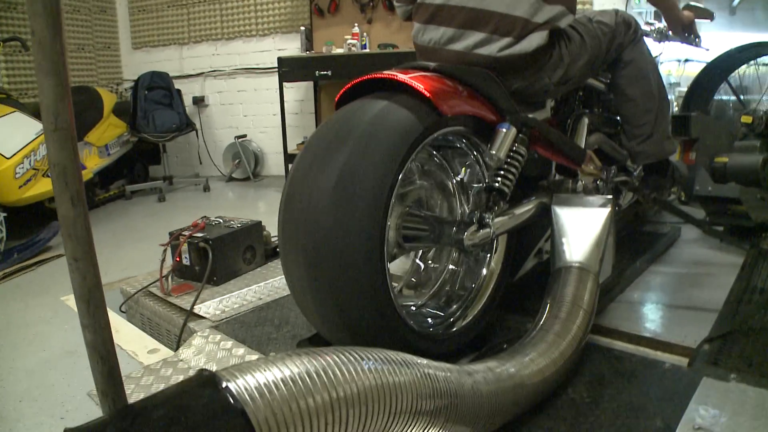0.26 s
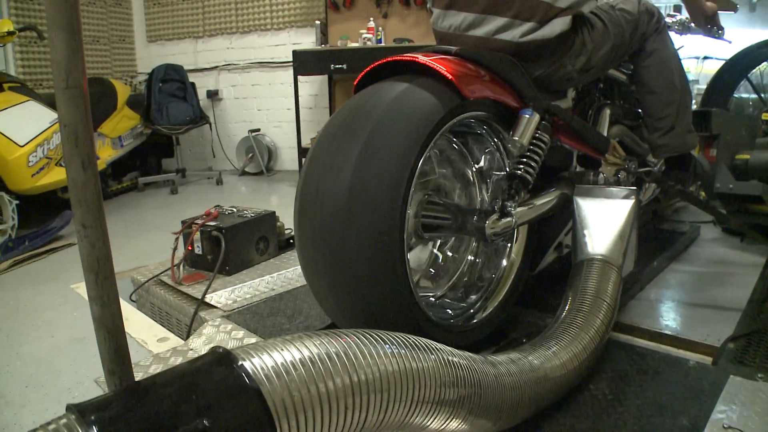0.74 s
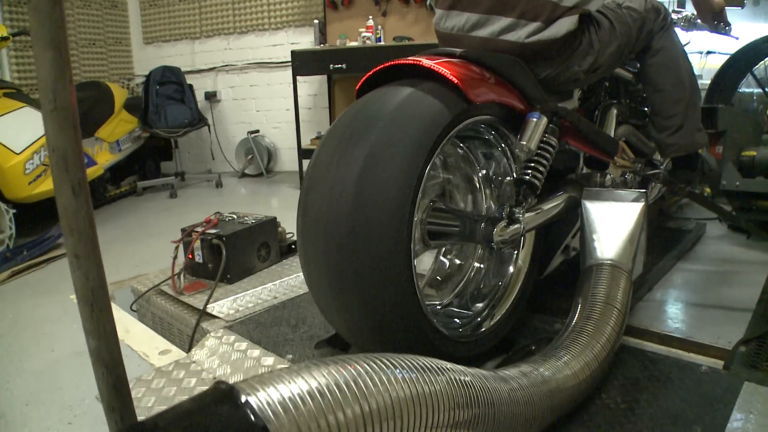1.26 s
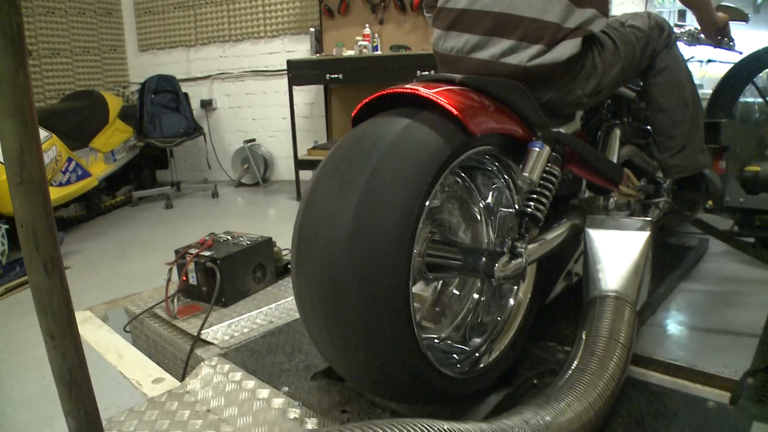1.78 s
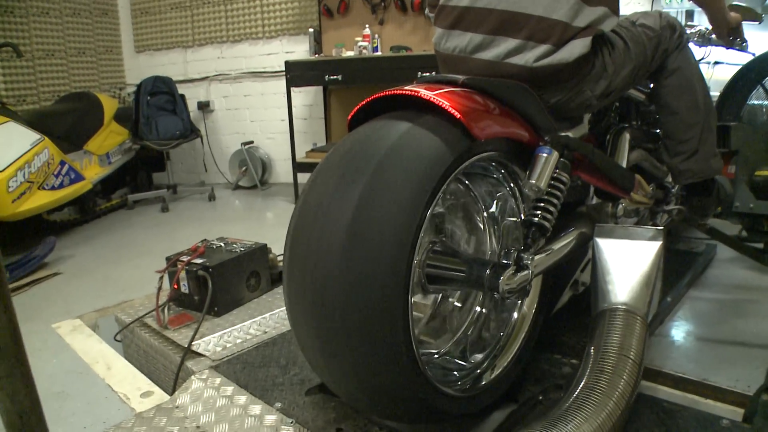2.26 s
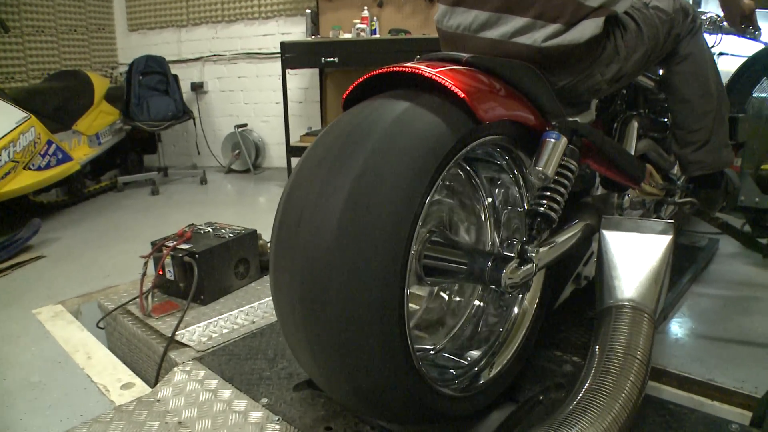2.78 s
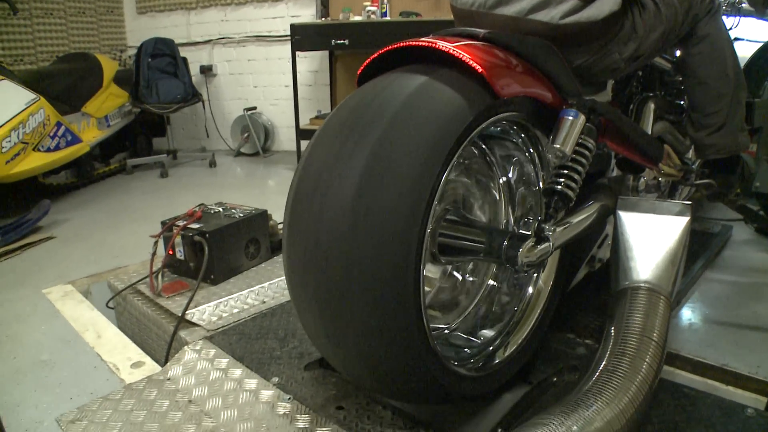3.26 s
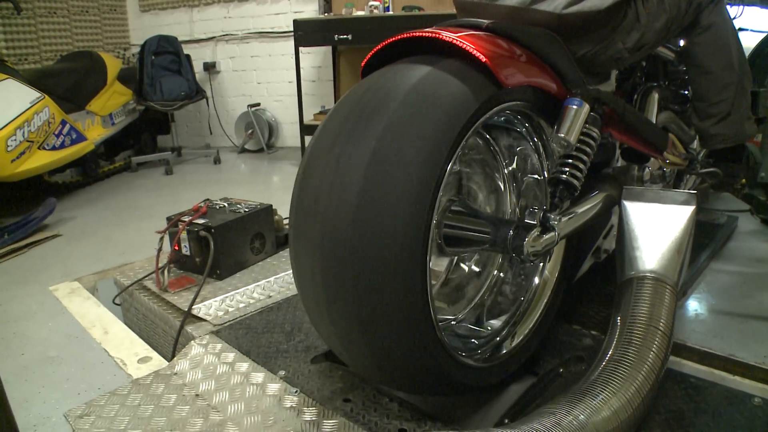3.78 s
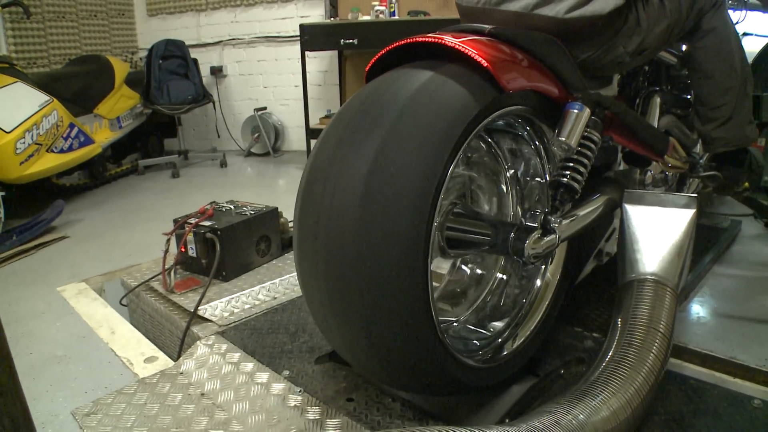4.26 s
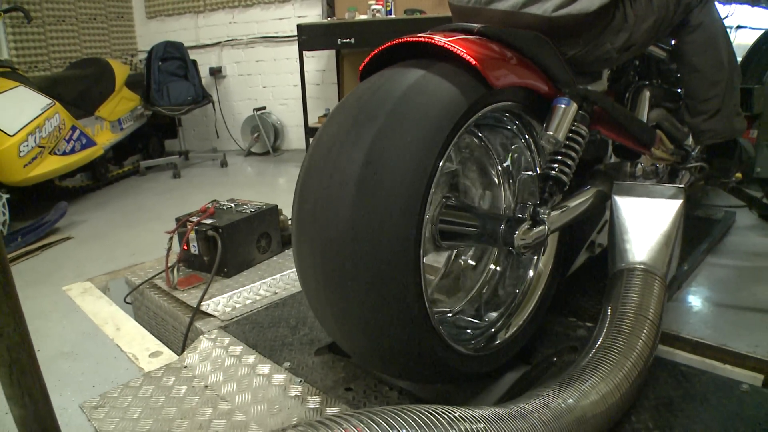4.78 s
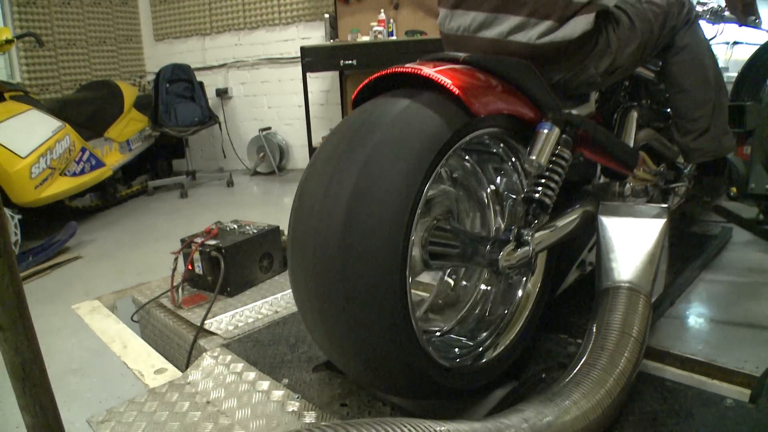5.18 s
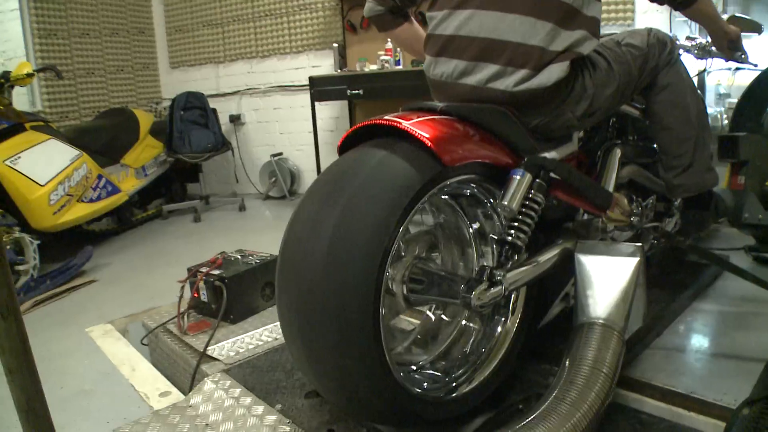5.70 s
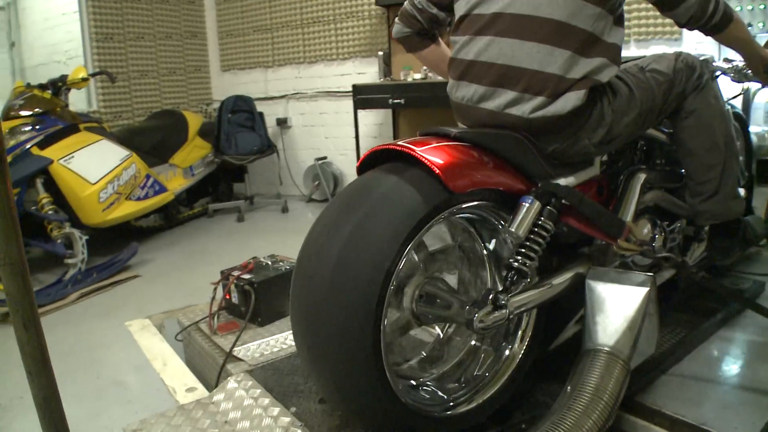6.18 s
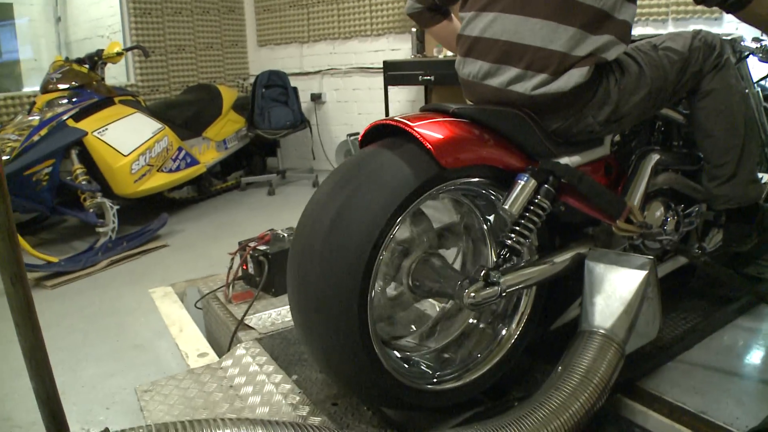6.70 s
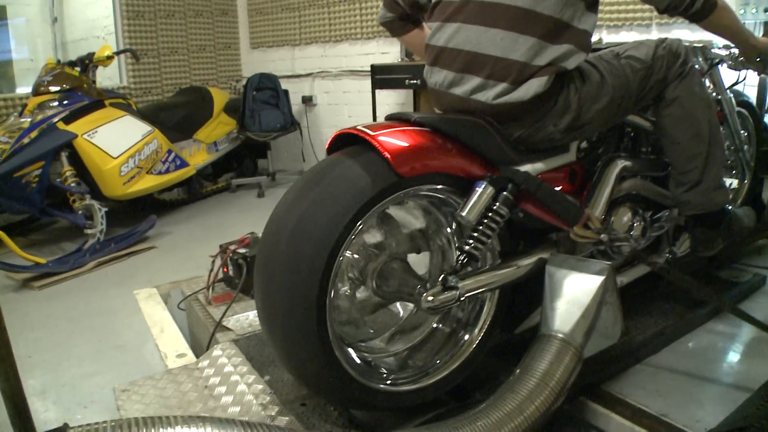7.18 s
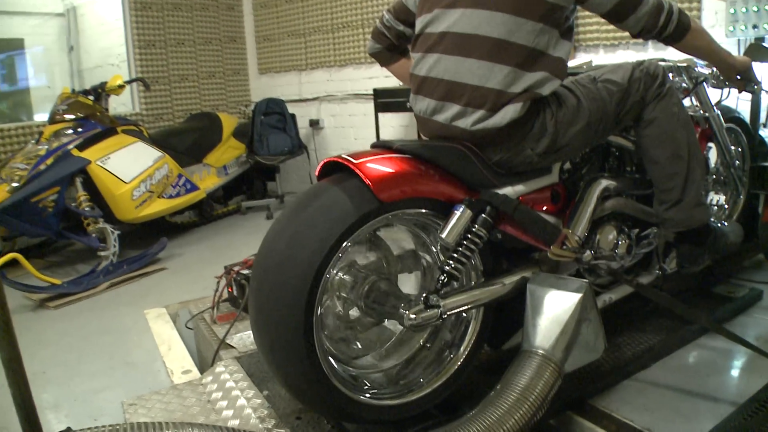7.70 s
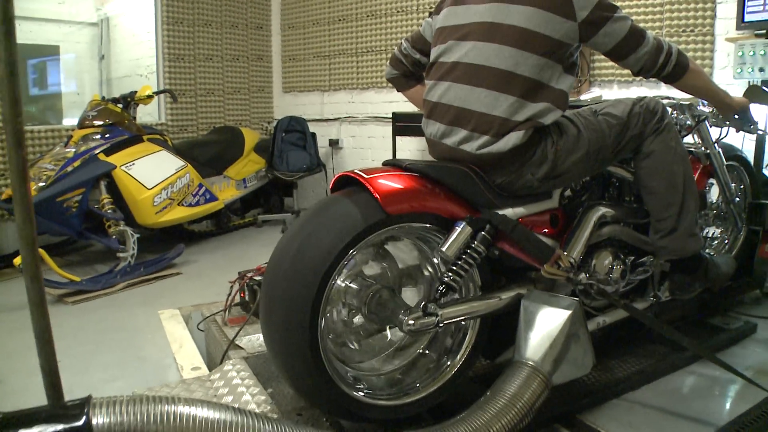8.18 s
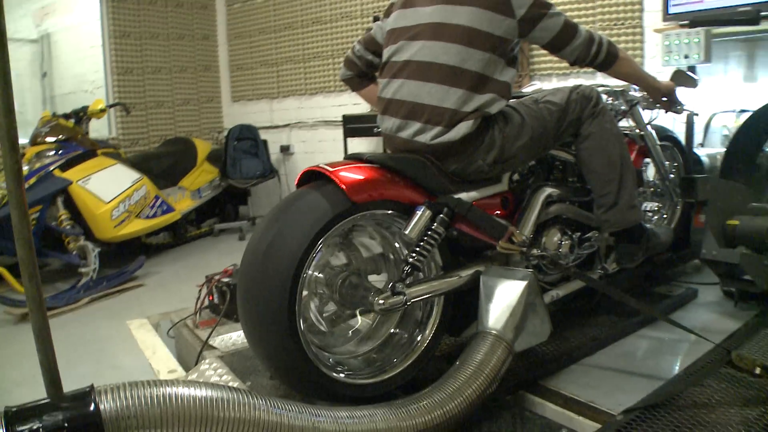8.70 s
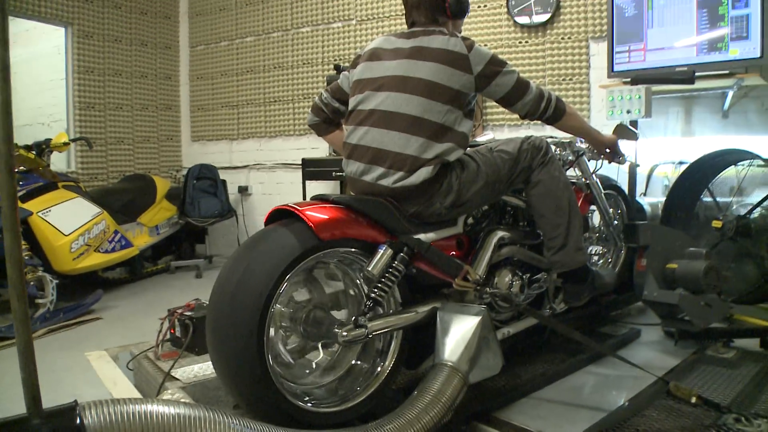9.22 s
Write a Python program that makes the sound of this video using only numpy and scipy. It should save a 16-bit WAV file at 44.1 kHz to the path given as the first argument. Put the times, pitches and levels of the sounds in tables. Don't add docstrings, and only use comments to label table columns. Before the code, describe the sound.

Close behind the rear wheel, a large V-twin runs on rollers in a padded workshop. Its deep exhaust throbs fast and unevenly at about seventeen cycles a second, with heavy thumps, brief choked gaps and sharp spits. Valve clatter and hiss ride on top. After the middle it quickens, smooths and rises slightly in pitch while gear whine and a faint breathy compressor whistle emerge. Stereo microphone, loud and lightly saturated.

```python
import sys
import numpy as np
from scipy import signal
from scipy.fft import rfft, irfft, next_fast_len
from scipy.io import wavfile
from scipy.ndimage import uniform_filter1d

SR = 44100
rng = np.random.default_rng(int(sys.argv[2]) if len(sys.argv) > 2 else 0)


def to_linear_factor(level_db):
    exponent = np.asarray(level_db, float) / 20
    return 10 ** exponent


def wav_out(sig):
    wavfile.write(sys.argv[1], SR, np.round(np.clip(np.atleast_2d(sig).T, -1, 1) * 32767).astype(np.int16))


N = 416744
PAD = next_fast_len(N + SR)


def rms_one(x):
    return x / np.sqrt(np.mean(x ** 2) + 1e-20)


def in_time(rows):
    s, *columns = np.transpose(rows)
    return [np.interp(np.arange(N) / SR, s, c) for c in columns]


def in_pitch(rows):
    hz, *columns = np.transpose(rows)
    grid = np.log(np.arange(PAD // 2 + 1) * SR / PAD + 1)
    return [np.interp(grid, np.log(hz), c) for c in columns]


def resonance(hz, width_hz):
    grid = np.arange(PAD // 2 + 1) * SR / PAD
    return 1j * grid * width_hz / (hz ** 2 - grid ** 2 + 1j * grid * width_hz)


def boost_or_dip(hz, width_hz, db):
    return 1 + (to_linear_factor(db) - 1) * resonance(hz, width_hz)


def shaped(x, response):
    return irfft(rfft(x, PAD) * response, PAD)[..., :N]


def contacts(turns, share):
    return np.flatnonzero(np.diff(np.floor(turns - share)) > 0)


def exhaust(turns, cycle_hz, exhaust_db, uneven, moved):
    # f/Hz, width/Hz, level/dB first place, level/dB second place, sign at the
    duct = [(41.9, 4.0, -11.8, -9.2, 1), (50.9, 74.9, -21.1, -22.9, -1), (73.9, 12.5, -8.6, -7.7, 1),
            (88.6, 10.7, -4.7, -2.5, -1), (97.4, 16.6, -12.0, -4.5, 1), (125.3, 16.9, -6.4, -5.0, -1),
            (135.5, 9.4, -3.7, -5.4, 1), (152.5, 4.0, -14.1, 4.4, 1), (177.7, 6.8, -2.0, 1.9, 1),
            (185.2, 4.4, -1.9, 1.7, -1), (194.4, 10.4, 0.2, -4.6, 1), (212.1, 5.7, -0.0, 3.1, -1),
            (221.5, 5.7, -0.3, 4.9, 1), (243.5, 5.9, 2.6, 3.9, -1),
            (253.4, 6.1, -11.0, -1.7, 1), (273.6, 4.4, -15.5, -9.6, 1), (296.4, 4.0, -0.7, -6.5, 1),
             (323.0, 19.8, -26.6, -14.7, -1), (335.3, 8.2, -20.1, -11.9, 1), (402.2, 25.0, -14.5, -32.0, 1),
             (412.6, 37.6, -14.6, -22.5, -1), (472.6, 37.0, -24.7, -18.8, -1),
             (509.9, 20.4, -26.4, -18.9, 1), (568.3, 47.0, -11.5, -17.2, -1), (572.5, 30.5, -8.8, -19.2, 1),
             (644.9, 25.3, -27.0, -18.5, 1), (718.1, 131.9, -64.1, -25.0, -1),
             (972.1, 157.7, -19.8, -44.8, 1)]
    # f/Hz, width/Hz, level/dB
    cold_duct = [(199, 18, 5.5), (222.7, 12.7, -13), (279, 30, -9.5)]
    # f/Hz, width/Hz, level/dB
    first_place_dip = (395, 13.3, -19)
    warm_from_s, warm_takes_s = 1.3, .74
    jitter_s = .001
    roar_db, roar_aside_db = 13, -4

    pulses = np.zeros(N + SR)
    # share of the cycle, dB
    for share, level_db in ((0, 0), (.593, -16.7)):
        at = contacts(turns, share)
        strength, late = rng.standard_normal((200, 2))[:len(at)].T
        now = np.clip(at - SR, 0, N - 1)
        delay = (jitter_s * SR * uneven[now] * late).astype(int)
        at = np.clip(at + delay, 0, N + SR - 1)
        pulses[at] = to_linear_factor(level_db) * (1 + uneven[now] * strength) * SR / cycle_hz[now] / 2
    roar = to_linear_factor(roar_db + roar_aside_db * np.r_[np.zeros(SR), moved])
    pulses += roar * rng.standard_normal(N + SR)
    spectrum = rfft(pulses, PAD) * walls()

    first, second = 0, 0
    for hz, width_hz, first_db, second_db, sign in duct:
        mode = sign * resonance(hz, width_hz)
        first = first + to_linear_factor(first_db) * mode
        second = second + to_linear_factor(second_db) * mode
    first = first * boost_or_dip(*first_place_dip)
    cold = first * np.prod([boost_or_dip(*row) for row in cold_duct], axis=0)
    cold, first, second = (irfft(spectrum * place, PAD)[SR:SR + N] for place in (cold, first, second))
    warm = np.clip((np.arange(N) / SR - warm_from_s) / warm_takes_s, 0, 1)
    first = cold + warm * (first - cold)
    return to_linear_factor(exhaust_db + 2.5) * ((1 - moved) * first + moved * second)


def walls():
    scatter_hz, scatter_s, pulse_cut_hz = 325, .045, 820
    grid = np.arange(PAD // 2 + 1) * SR / PAD
    echoes = rfft(rng.standard_normal(SR) * np.exp(-np.arange(SR) / SR / scatter_s), PAD)
    smear = np.where(grid > scatter_hz, echoes / abs(echoes), 1)
    return smear / np.sqrt(1 + (grid / pulse_cut_hz) ** 12)


def unevenness():
    # t/s, added share, relative length
    stumbles = [
        (.55, .35, 1),
        (1.35, .38, 1),
        (2.65, .27, 1),
        (4.3, .15, 1),
        (5.42, .34, 1.6),
        (9.04, .7, .4),
    ]
    cold, settled, settle_s, stumble_s = .2, .03, 4.6, .17
    t = np.arange(N) / SR
    uneven = settled + (cold - settled) * np.exp(-(t / settle_s) ** 2)
    for s, share, length in stumbles:
        uneven += share * np.exp(-((t - s) / (length * stumble_s)) ** 2)
    return uneven


def heavy_firings(ringing):
    # t/s, peak level/dB
    heavy = [(0.172, -0.5), (0.351, -1.5), (0.409, -4), (0.644, -3), (1.234, -4), (1.305, -2),
             (1.473, -1.5), (1.591, 0.5), (1.708, -2.5), (1.766, -5.5), (1.885, -0.5), (2.002, -4.5),
             (2.122, -1), (2.181, -3), (2.238, -6), (2.358, 0), (2.479, -3.5), (2.594, -1.5), (4.302, -1.5),
             (4.921, -4.5), (4.979, -2.5), (5.091, -5), (5.236, -0.5), (5.294, -9), (5.469, -1.5),
             (5.586, -2.5), (5.701, -4), (5.759, -3), (9.045, -8)]
    # start t/s, end t/s, spacing/s, peak level/dB
    lopes = [
        (0.825, 1.1, .118, -5),
        (2.774, 4.2, .118, -3),
        (6.349, 6.72, .0563, -3.5),
    ]
    # f/Hz, share
    choked = [(110, 0), (150, 1)]
    swell_hz, warming_hz_per_s, warm_hz = 190.5, 9.9, 224.5
    choke_db, choke_late_s, choke_s = .5, .0018, .01
    lean_choke = .42

    out, choke = np.zeros(N), np.zeros(N)
    t = np.arange(-.03, .04, 1 / SR)
    swell = np.exp(-(t / np.where(t < 0, .009, .005)) ** 2)
    sag = np.exp(-((t - choke_late_s) / choke_s) ** 2)
    loping = [(s, peak_db) for start, end, step, peak_db in lopes for s in np.arange(start, end, step)]
    for s, peak_db in heavy + loping:
        hz = min(swell_hz + warming_hz_per_s * s, warm_hz)
        i = round((s + .00591 + t[0]) * SR)
        out[i:i + len(t)] += to_linear_factor(peak_db - 4.5) * swell * np.cos(2 * np.pi * hz * t * (1 - 4.5 * t))
        choke[i:i + len(t)] += to_linear_factor(peak_db + choke_db) * sag
    for start, end, step, _ in lopes:
        for s in np.arange(start + step / 2, end, step):
            i = round((s + t[0]) * SR)
            choke[i:i + len(t)] += lean_choke * sag
    return out + ringing - np.tanh(choke) * shaped(ringing, in_pitch(choked)[0])


def duct_flow(low, turns):
    # t/s, depth 0-1
    lull = [(0, 0), (6.7, 0), (6.85, .6), (7.5, .65), (7.9, 0), (9.45, 0)]
    lull_s, steepen = 7.017, .4
    depth, = in_time(lull)
    angle = 2 * np.pi * (turns[SR:] - turns[SR + round(lull_s * SR)])
    low = -low * (1 - depth * (.5 + .5 * np.cos(angle)) ** 3)
    above_orders = signal.butter(3, 280, "high", fs=SR, output="sos")
    return low + steepen * signal.sosfilt(above_orders, low ** 2)


def clatter(turns, cycle_hz, moved):
    # t/s, level/dB
    load = [(0.0, -51.5), (0.76, -54), (1.1, -51), (1.45, -53.5), (2.08, -53), (2.66, -53), (4.4, -52),
            (4.9, -48.5), (5.6, -52.5), (6.0, -50.5), (6.71, -53), (6.97, -57), (7.24, -58.5), (7.63, -55),
            (9.45, -51)]
    # f/Hz, spectral level/dB first place, second place
    casing_colour = [(255, 4.5, 3), (500, -1.5, -7.5), (930, -11.5, -5.5), (1380, -10.5, -9.5),
                     (2670, -12, -12.5), (2870, -16, -15.5), (4240, -15, -18.5), (4140, -22, -10),
                     (4710, -24, -24), (5200, -35, -34), (7000, -72, -33.5)]
    # f/Hz, spectral level/dB
    hiss_rows = [(4300, -14), (5000, -11.5), (5450, -4), (6050, -8), (7500, 0), (8300, -7), (9600, -7.5),
                 (10400, -4), (11700, -6), (12400, -5.5), (13300, -11), (13900, -18), (15000, -7.5),
                 (16500, -17)]
    # f/Hz, width/Hz, level/dB
    panel_modes = [(917, 77, 8.5), (1500, 75, 4.5), (1805, 180, 8), (2263, 150, 7.5), (2540, 89, 9),
                   (3363, 117, 11.5), (3770, 220, 6.5)]
    # t/s, peak level/dB, decay/s
    spit_events = [
        (0.405, -29, 0.014),
        (0.5246, -32, 0.021),
        (0.6474, -32, 0.006),
        (1.2904, -29, 0.018),
        (4.5844, -49, 0.022),
        (5.4106, -32, 0.04),
        (6.3639, -46, 0.02),
        (6.4994, -57, 0.02),
        (7.2064, -48, 0.024),
        (9.046, -36, 0.005),
    ]
    casing_over_db, casing_loss_db_per_hz, cruise_hz = 16, 5.5, 19.63
    panels_aside, knock_aside = .55, .35

    hiss_db, = in_time(load)
    casing_db = hiss_db + casing_over_db - casing_loss_db_per_hz * np.maximum(cycle_hz - cruise_hz, 0)
    panels = 1
    for hz, width_hz, db in panel_modes:
        panels = panels + (to_linear_factor(db) - 1) * abs(resonance(hz, width_hz)) ** 2
    first_db, second_db = in_pitch(casing_colour)
    first = to_linear_factor(first_db) * panels
    second = to_linear_factor(second_db) * panels ** panels_aside
    hiss_colour = to_linear_factor(in_pitch(hiss_rows)[0])

    white = rng.standard_normal((3, 2, N))
    beat = bursts(turns, decay_s=.0018, spread_db=8, floor=.99)
    knocks = white[0] * beat ** (.82 * (1 - knock_aside * moved))
    casing = (1 - moved) * rms_one(shaped(knocks, first)) + moved * rms_one(shaped(knocks, second))
    hiss = rms_one(shaped(white[1] * beat, hiss_colour))

    t, spit = np.arange(N) / SR, np.zeros(N)
    for s, peak_db, decay_s in spit_events:
        since = np.clip(t - s, 0, 1)
        spit += to_linear_factor(peak_db) * (t > s) * np.exp(-(since / decay_s) ** 3)
    spits = shaped(white[2] * spit, to_linear_factor(2) * hiss_colour + to_linear_factor(17) * first)
    return to_linear_factor(casing_db + 7.5) * casing + to_linear_factor(hiss_db + 7.5) * hiss + spits


def bursts(turns, decay_s, spread_db, floor):
    # share of the cycle, level/dB
    valves = [(.0, -9), (0.191, 5), (0.302, -33), (.53, -2), (0.7, 5.5), (.8, -7)]
    hits = np.zeros(N + SR)
    for share, level_db in valves:
        at = contacts(turns, share)
        spread = np.clip(rng.standard_normal(200), -2, .8)[:len(at)]
        hits[at] = to_linear_factor(level_db + spread_db * spread)
    dying = signal.lfilter([1], [1, -np.exp(-1 / (decay_s * SR))], hits)[SR:]
    return floor + uniform_filter1d(dying, size=90)


def gears(turns, moved):
    # multiple of the cycle, level/dB first place, level/dB second place
    meshes = [(20, -43, -36.5), (24, -61, -38.5), (28.4, -69, -43), (30.63, -39, -40.5), (33.66, -45, -42),
              (36.4, -73, -51), (38.07, -70, -39), (40.06, -53, -55)]
    waver_db = 3.5
    waver = rms_one(uniform_filter1d(rng.standard_normal((len(meshes), N // 400 + 2)), size=9))
    whine = np.zeros(N)
    for (order, first_db, second_db), w in zip(meshes, waver):
        wavering = waver_db * np.interp(np.arange(N) / 400, np.arange(len(w)), w)
        level_db = first_db + (second_db - first_db) * moved + 2 + wavering
        whine += to_linear_factor(level_db) * np.sin(2 * np.pi * order * turns[SR:])
    return whine


def turbo():
    # t/s, f/Hz, level/dB
    whistle = [(0, 3730, -66), (5.5, 3725, -55), (6.2, 3710, -55), (6.8, 4050, -53.5), (7.3, 4200, -60),
               (8.2, 4400, -60), (9.45, 4570, -61)]
    hz, level_db = in_time(whistle)
    narrow = signal.butter(2, 150, fs=SR, output="sos")
    a, b = signal.sosfilt(narrow, rng.standard_normal((2, 2, N)))
    angle = 2 * np.pi * np.cumsum(hz) / SR
    return to_linear_factor(level_db + 10) * rms_one(a * np.cos(angle) + b * np.sin(angle))


def microphone_ports(direct, scattered):
    # f/Hz, phase lag of left/rad, likeness 0-1, left-right level/dB
    ports = [(40, 0.017, 1, 0.2), (298, 0.24, 0.99, -1), (965, 0.43, 0.98, -0.3), (1800, 0.5, 0.72, -2),
             (2590, 0.74, 0.98, 1.2), (2920, 1.5, 0.1, 6.5), (2900, 2.8, 0.22, 4), (4220, 2.6, 0.99, -1),
             (5280, 2.3, 0.54, 0), (7760, 2.8, 0.98, -2.5), (8770, 4.6, 0.32, -5), (10100, 2.06, 0.41, 0.5),
             (11700, 3.65, 0.88, -2), (13700, 3, 0.36, -6), (14800, 3.1, 0.5, 3)]
    lag, alike, balance_db = in_pitch(ports)
    alike = np.clip(alike, 0, 1)
    same = shaped(direct, np.sqrt((1 + alike) / 2))
    other = shaped(scattered, np.sqrt((1 - alike) / 2))
    left = shaped(same + other, to_linear_factor(balance_db / 2) * np.exp(-.5j * lag))
    right = shaped(same - other, to_linear_factor(-balance_db / 2) * np.exp(.5j * lag))
    return np.array([left, right])


def scene():
    # t/s, four-stroke cycle f/Hz
    speed = [(0, 16.95), (3.9, 16.95), (4.3, 17.05), (5.1, 17.16), (5.9, 17.25), (6.3, 17.5), (6.9, 18.1),
             (7.5, 18.68), (8.4, 19.48), (9, 19.92), (9.45, 20.2)]
    # t/s, level/dB
    running = [(0, -22), (1.7, -22.5), (4.5, -21), (5.9, -22.5), (6.6, -19.5), (7.3, -23.5), (8.3, -21.5),
               (9.45, -22.5)]
    # t/s, share 0-1
    steps_aside = [(0, 0), (2, 0), (4.5, .3), (6.3, 1), (9.45, 1)]
    first_firing_s = .2067
    cycle_hz, = in_time(speed)
    exhaust_db, = in_time(running)
    moved, = in_time(steps_aside)
    turns = np.cumsum(np.r_[np.full(SR, cycle_hz[0]), cycle_hz]) / SR
    turns -= turns[SR + round(first_firing_s * SR)]
    low = heavy_firings(exhaust(turns, cycle_hz, exhaust_db, unevenness(), moved))
    low = duct_flow(low, turns) + gears(turns, moved)
    late_low = np.roll(low, 1500)
    direct, scattered = clatter(turns, cycle_hz, moved) + turbo() + [low, late_low]
    return microphone_ports(direct, scattered)


def low_pass(x):
    return signal.sosfilt(signal.butter(12, 17090, fs=SR, output="sos"), x)


def record(dry):
    low_cut = signal.butter(2, 30, "high", fs=SR, output="sos")
    top_cut = signal.ellip(10, .5, 80, 15720, fs=SR, output="sos")
    dry = signal.sosfilt(low_cut, dry)
    mix = signal.sosfilt(top_cut, 1.2 * np.tanh(dry / 1.2))
    return low_pass(mix)


dry = scene()
out = record(dry)
wav_out(out)
```